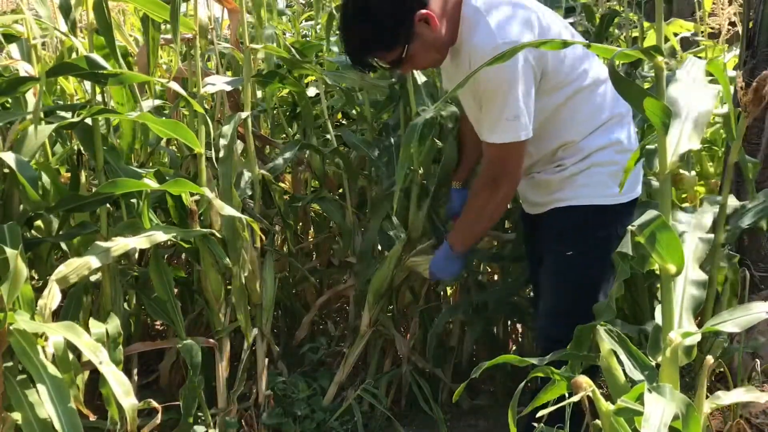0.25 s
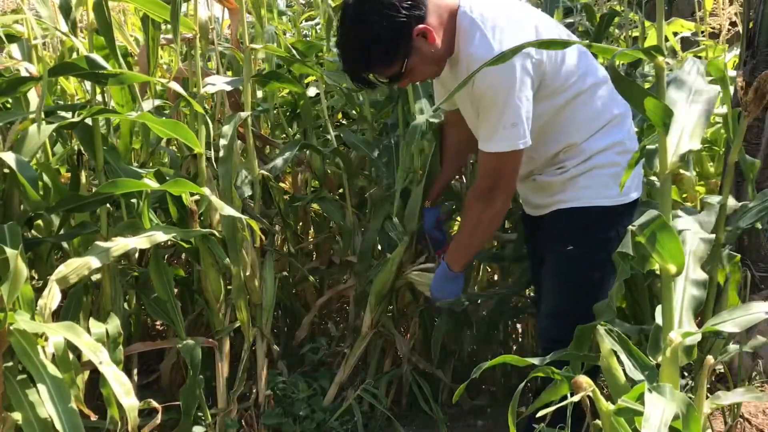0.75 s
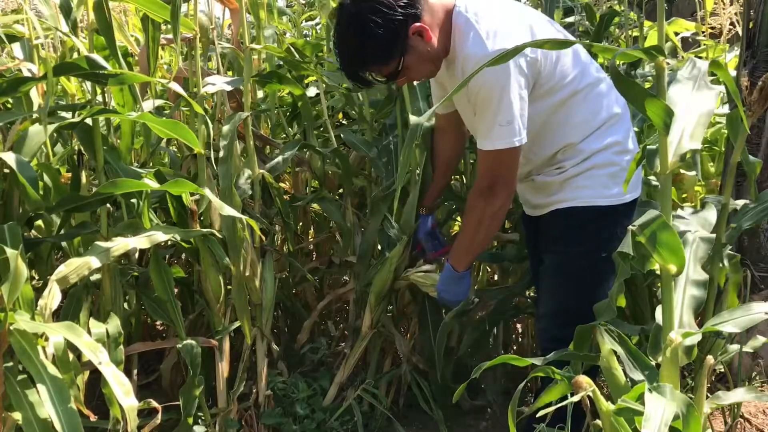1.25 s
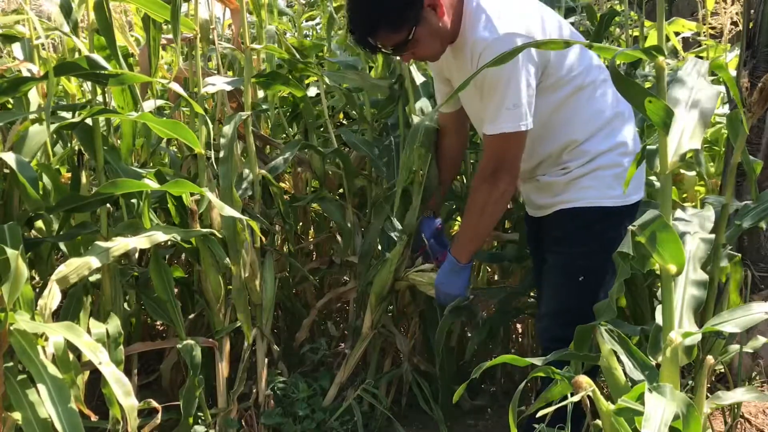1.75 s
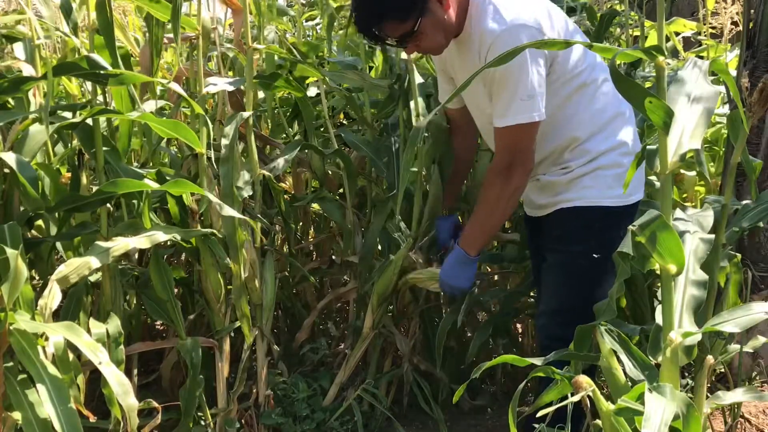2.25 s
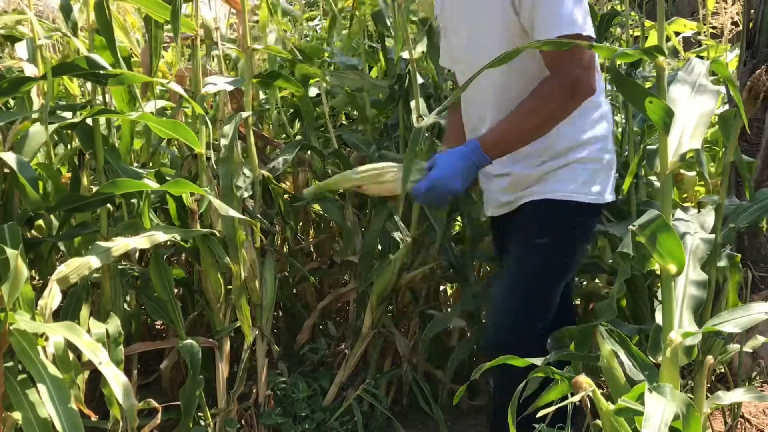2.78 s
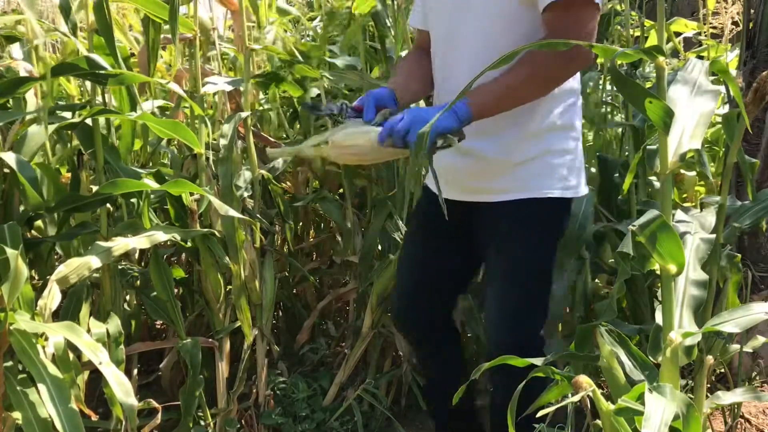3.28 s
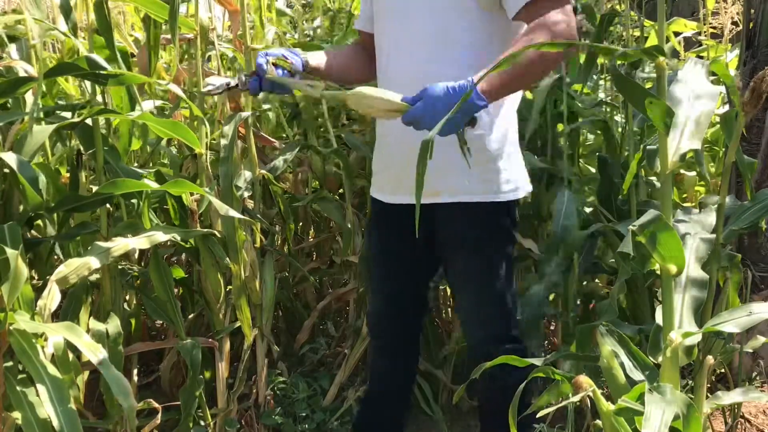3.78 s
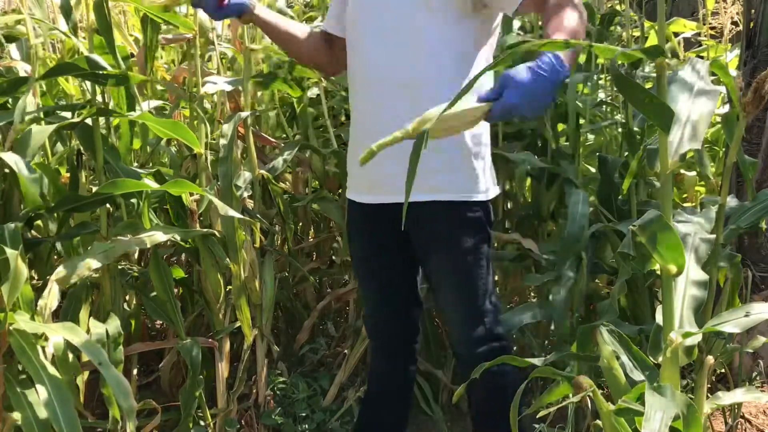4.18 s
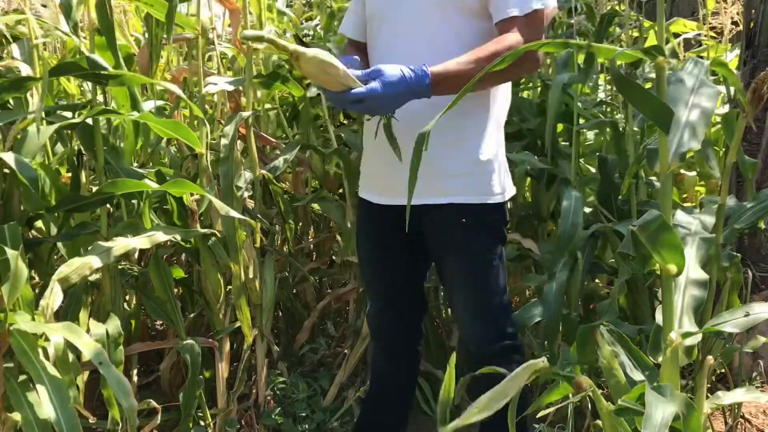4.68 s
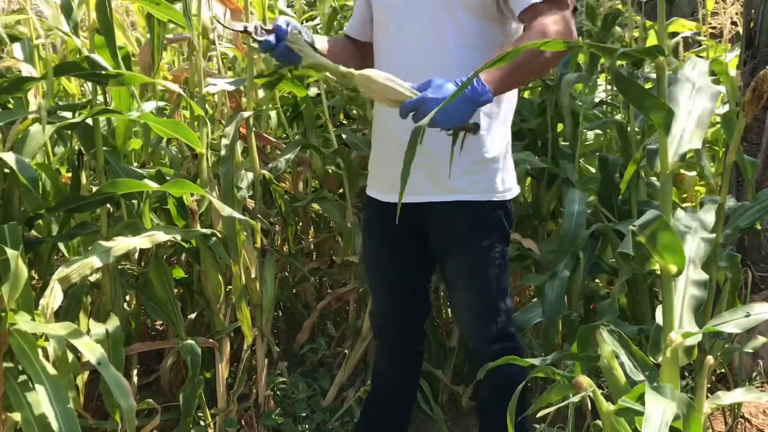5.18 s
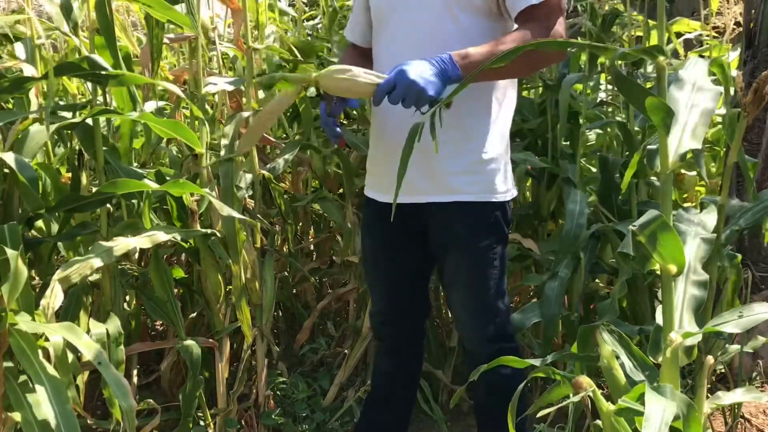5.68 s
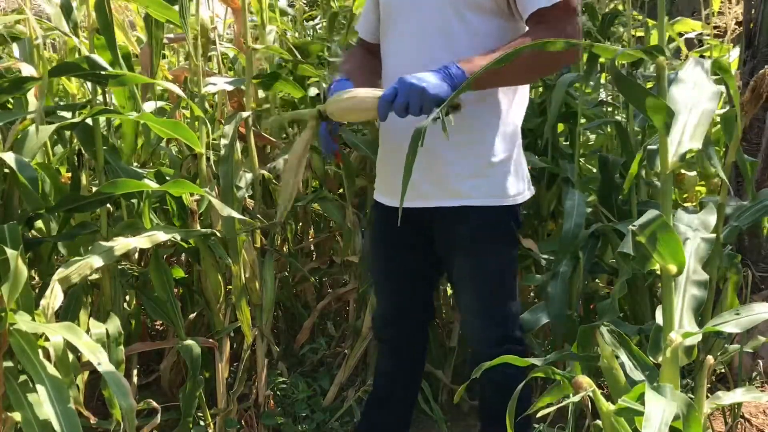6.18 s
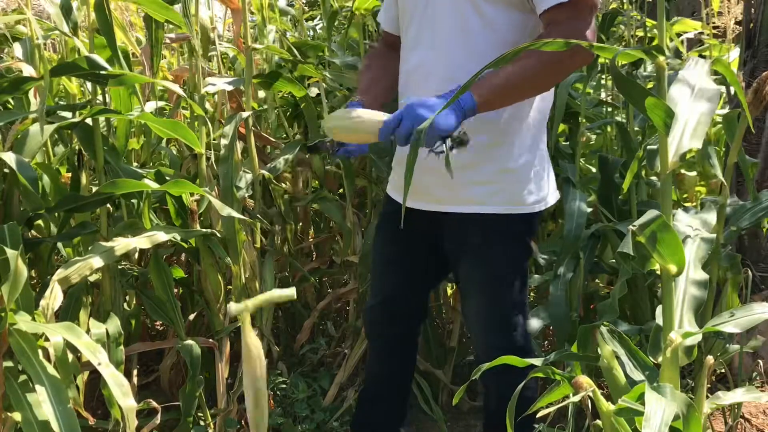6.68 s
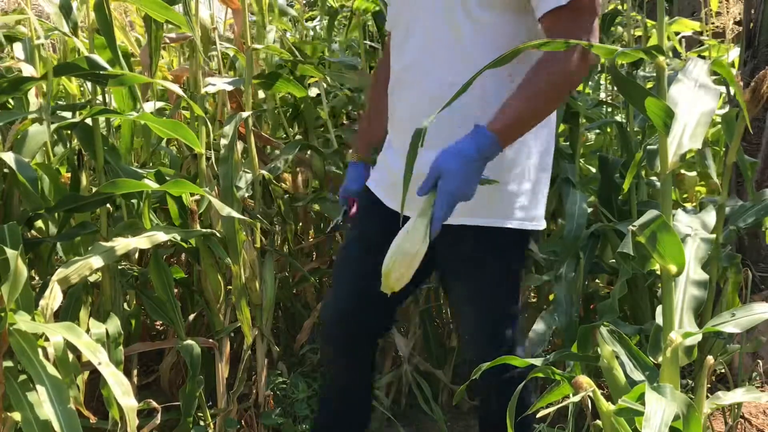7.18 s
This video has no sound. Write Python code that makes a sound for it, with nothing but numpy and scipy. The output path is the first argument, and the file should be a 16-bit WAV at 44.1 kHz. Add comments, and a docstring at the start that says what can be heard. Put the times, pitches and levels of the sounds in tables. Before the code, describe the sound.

Dry corn leaves rustle as hand shears crack through stalks and husks with sharp snips, over distant traffic hiss and a low engine hum.

```python
"""Dry leaves rustle in gloved hands in a dense garden bed, under far tyre hiss and low engine drones.
Hand shears cut plant stalks: fibres crack and crunch, the blades clack shut, husks squeak, stalks knock.
Cracks are pulses ringing a stalk; rustle and crunches are clumped ticks and noise shaped by leaf spectra.
Blades and knocks are decaying sines, squeaks broken tones in a rasp, engines unsteady low sines, traffic noise."""
import sys
import numpy as np
from scipy import signal
from scipy.fft import rfft, irfft, next_fast_len
from scipy.io import wavfile
from scipy.ndimage import uniform_filter1d, map_coordinates

SR = 44100
rng = np.random.default_rng(int(sys.argv[2]) if len(sys.argv) > 2 else 0)


def bounce(signal):
    """Save signal as a 16-bit WAV file at the path given by the first command-line argument."""
    frames = np.transpose(np.atleast_2d(signal))
    limited = np.clip(frames, -1, 1)
    pcm = np.round(limited * 32767).astype(np.int16)
    wavfile.write(sys.argv[1], SR, pcm)


def boost_factor(decibels):
    """Convert a level in decibels to a linear amplitude factor."""
    exponent = np.asarray(decibels, float) / 20
    return 10 ** exponent


N = 328104

# spectrum of dry leaves: freq_hz, relative_density_db (per Hz)
LEAF_SPECTRUM = [(800, -38), (1800, -10), (3000, 2), (5000, 1), (7000, -1), (10300, -3), (13000, 0.5),
                 (17000, -7.5)]


def unit(x):
    """Scale to rms 1."""
    return x / np.sqrt(np.mean(x ** 2) + 1e-20)


def curves(rows):
    """One value per sample for each column after the time."""
    time_s, *cols = np.transpose(rows)
    return [np.interp(np.arange(N) / SR, time_s, col) for col in cols]


def wobble(rate_hz):
    """Smooth random curve with rate_hz knots a second."""
    knots = rng.standard_normal(int(N * rate_hz / SR) + 4)
    return map_coordinates(knots, [np.arange(N) * rate_hz / SR])


def coloured(x, spectrum):
    """Filter x by (Hz, dB) points, interpolated over log frequency; rms 1."""
    size = next_fast_len(len(x) + 8192)
    freq_hz, level_db = np.transpose(spectrum)
    bins_hz = np.fft.rfftfreq(size, 1 / SR)
    gain = boost_factor(np.interp(np.log(bins_hz + 1), np.log(freq_hz + 1), level_db))
    return unit(irfft(rfft(x, size) * gain, size)[:len(x)])


def resonate(x, hz, width_hz):
    """Two-pole resonance with gain 1 at its centre."""
    return signal.lfilter(*signal.iirpeak(min(hz, .4 * SR), hz / width_hz, SR), x)


def grounded(x):
    """Add short echoes off soil and stalks; each call stretches their paths a little."""
    # echoes: nominal_delay_s, level_db
    echoes = [(.00095, -7), (.002, -6)]
    stretch = rng.uniform(.75, 1.25)
    out = x
    for delay_s, level_db in echoes:
        delayed = np.pad(x, (round(stretch * delay_s * SR), 0))[:len(x)]
        out = out + boost_factor(level_db) * delayed
    return out


def add(out, start_s, x):
    """Mix x into out from start_s."""
    part = out[round(start_s * SR):][:len(x)]
    part += x[:len(part)]


def crackle(per_second, spread_db, clump_db, share):
    """Clumped ticks of very unequal size and pitch, on a bed of noise; share is the ticks' power share."""
    pitches_hz = np.geomspace(350, 14000, num=9)
    mean_hz = pitches_hz.mean()
    ticks = np.zeros(N)
    for hz in pitches_hz:
        # small fibres break more often
        chance = per_second / SR * (hz / mean_hz) ** .5 / len(pitches_hz)
        struck = rng.random(N) < chance
        sizes = boost_factor(spread_db * rng.exponential(1, N).clip(0, 3)) * rng.standard_normal(N)
        ticks += resonate(struck * sizes, hz, .9 * hz) * (mean_hz / hz) ** .25
    share = np.clip(share, 0, 1)
    bed = np.sqrt(share) * unit(grounded(ticks)) + np.sqrt(1 - share) * rng.standard_normal(N)
    return bed * boost_factor(clump_db * wobble(35) + 0.79 * wobble(130))


def patchy(x, patchy_db):
    """Random louder and softer patches in time and pitch, as different leaves take turns."""
    z = signal.stft(x, nperseg=256)[2]
    field = uniform_filter1d(rng.standard_normal(z.shape), size=14, axis=0)
    field = uniform_filter1d(field, size=16, axis=1)
    return signal.istft(z * boost_factor(patchy_db * unit(field)), nperseg=256)[1][:len(x)]


def handled(per_second, clump_db, share):
    """One crackle heard in the leaves, in the woody stems and in papery edges; each rms 1."""
    # woody stems: freq_hz, relative_density_db (per Hz)
    stem_spectrum = [(150, -9.5), (320, -7.5), (550, -2), (900, -4), (1800, 1), (2800, -13.5), (5000, -25)]
    # thin dry leaf edges: freq_hz, relative_density_db (per Hz)
    paper_spectrum = [(4000, -46), (8000, -6), (10300, -8.5), (12500, 1.5), (17000, -10)]
    bed = patchy(crackle(per_second, spread_db=5.5, clump_db=clump_db, share=share), patchy_db=1.7)
    return coloured(bed, LEAF_SPECTRUM), coloured(bed, stem_spectrum), coloured(bed, paper_spectrum)


def rustle():
    """Dry leaves hiss and tick; thicker stems creak lower under the same movement."""
    # how hard the hands move the leaves: time_s, level_db
    movement = [(0.0, -56), (0.54, -58.5), (0.81, -57), (1.13, -62.5), (1.4, -59.5), (1.52, -67),
                (1.72, -60.5), (1.99, -63.5), (2.13, -48), (2.45, -55.5), (2.62, -54.5), (3.0, -58),
                (3.36, -54.5), (3.79, -60), (4.64, -64), (4.85, -58), (5.01, -63), (5.41, -69.5),
                (6.28, -70), (6.51, -55.5), (6.78, -63), (7.15, -55), (7.44, -62.5)]
    leaf_db, = curves(movement)
    stem_db = -68 + 0.49 * (leaf_db + 55.5)  # stems follow the movement less widely
    leaves, stems, _ = handled(1500, clump_db=-2.0, share=0.13)
    ticks = coloured(crackle(220, spread_db=2, clump_db=1, share=1), LEAF_SPECTRUM)
    return boost_factor(leaf_db) * (leaves + boost_factor(-9.5) * ticks) + boost_factor(stem_db) * stems


def traffic():
    """Tyre hiss and rumble from a distant road: slowly wavering shaped noise."""
    # road noise: freq_hz, relative_density_db (per Hz)
    road_spectrum = [(28, -48), (40, -16.5), (60, -4), (120, -9), (160, -16), (215, -17), (300, -23),
                     (520, -25), (900, -21), (1550, -29), (2500, -37), (5000, -40.5), (10300, -43.5),
                     (14000, -48), (17000, -32)]
    return boost_factor(-54 + 0.9 * wobble(2.51)) * coloured(rng.standard_normal(N), road_spectrum)


def drone(hz, level_db, rows):
    """One engine tone, a little unsteady, faded in and out around the span of its rows."""
    t = np.arange(N) / SR
    heard = np.clip(np.minimum(t - rows[0][0], rows[-1][0] - t) / 0.12 + 1, 0, 1)
    phase = 2 * np.pi * (np.cumsum(hz) / SR + rng.random()) + 0.42 * wobble(7)
    return np.sqrt(2) * heard * boost_factor(level_db + 1.6 * wobble(8)) * np.sin(phase)


def engines():
    """Near engine orders share one shaft and one resonant pipe; other engine tones hum low around them."""
    # engine pulling away and changing gear: time_s, third_order_hz, level_db (before order and pipe)
    near_engine = [(5.4, 53, -55), (5.721, 54.8, -47), (6.161, 74.8, -39.5), (6.5, 78, -37.5), (7, 84, -42),
                   (7.07, 77, -54), (7.44, 76, -56)]
    # engine orders: order, relative_level_db
    orders = [(3, 0), (4, -1), (5, -1)]
    # other engine tones: steady or slowly gliding low hums, some from the near engine after its gear change:
    # start_s, end_s, start_hz, end_hz, level_db
    other_tones = [(0, 0.9, 98.4, 109, -58), (.95, 1.76, 71.8, 69.2, -60.5),
                   (1.05, 1.85, 102.4, 107.9, -59.5), (2, 2.6, 64.1, 61.1, -59),
                   (2.3, 3.1, 68, 80.2, -56.5), (2.9, 3.67, 75.1, 84.7, -56),
                   (3.25, 3.9, 208.3, 211.6, -66), (6.6, 8.85, 49.85, 55.7, -51.5),
                   (7.05, 8.1, 100.8, 96.6, -53.5), (6.95, 8.6, 122.1, 125.4, -57.5),
                   (5.4, 6.9, 182.7, 179.5, -66)]
    exhaust_hz, exhaust_width_hz = 73, 13.3
    third_order_hz, near_db = curves(near_engine)
    out = np.zeros(N)
    for order, order_db in orders:
        hz = third_order_hz * order / 3
        pipe_db = -10 * np.log10(1 + (2 * (hz - exhaust_hz) / exhaust_width_hz) ** 2)
        out += drone(hz, near_db + order_db + pipe_db, near_engine)
    for start_s, end_s, start_hz, end_hz, level_db in other_tones:
        rows = [(start_s, start_hz, level_db), (end_s, end_hz, level_db)]
        out += drone(*curves(rows), rows)
    return out


def crack(hz, t60_s, tail_db, wide_db):
    """A sharp pulse rings the stalk, then a dying crackle as neighbouring fibres give; peak 1."""
    t = np.arange(SR // 8) / SR
    push = boost_factor(tail_db - 60 * t / t60_s) * rng.standard_normal(len(t))
    push += boost_factor(-35.0 - 60 * t / 0.16) * rng.standard_normal(len(t))  # scatter among the stalks
    push[0] = 1
    ring = resonate(push, hz, .45 * hz)
    # the stalk wall answers lower
    wall = boost_factor(-4.5) * resonate(push, 0.63 * hz, 0.14 * hz) + boost_factor(-12) * resonate(push, 860, 3700)
    treble = boost_factor(wide_db) * resonate(push, 14600, 11500)
    sound = grounded(ring + wall + treble)
    return np.pad(sound, (round(.0007 * SR), 0)) / np.abs(sound).max()


def snaps():
    """Single cracks of fibres and dry leaves; harder ones crackle on longer, high ones have more treble."""
    # cracks: start_s, peak_db, pitch_hz
    crack_events = [(0.087, -27.5, 5360), (0.171, -29, 9100), (0.178, -25, 9400), (0.195, -38, 3700),
                    (0.2309, -18, 5530), (0.2498, -22, 5000), (0.2516, -16.5, 5130), (0.271, -27, 3440),
                    (0.2782, -20.5, 5500), (0.3028, -12.5, 4900), (0.326, -10.5, 4900),
                    (0.363, -18.5, 4340), (0.6079, -19, 4470), (0.6997, -27, 2650), (0.789, -26.5, 3500),
                    (0.792, -25, 13000), (0.8263, -22.5, 4950), (0.8335, -24, 8540), (1.039, -25, 5100),
                    (1.109, -38, 9000), (1.643, -40, 13000), (1.947, -16.5, 3680), (1.967, -24, 6600),
                    (2.0115, -27, 5970), (2.0205, -36, 2600), (2.0342, -23, 6500), (2.0475, -19, 8500),
                    (2.0508, -13.5, 8150), (2.0585, -13.5, 4030), (2.0776, -17, 3920), (2.211, -29, 4000),
                    (2.375, -33.5, 2330), (2.4997, -26, 7000), (2.781, -32.5, 4340), (3.0802, -32.5, 1640),
                    (3.226, -33, 2400), (3.284, -31, 8870), (3.354, -28.5, 4250), (3.451, -28, 5500),
                    (3.694, -31, 5980), (3.793, -28.5, 4230), (3.922, -31.5, 5500), (3.928, -27, 4790),
                    (4.0395, -21, 1950), (4.0439, -12, 6760), (4.062, -19.5, 4300), (4.1085, -35, 5000),
                    (4.1206, -29, 4280), (4.1511, -31, 12500), (4.1625, -36, 11000), (4.271, -38, 4110),
                    (4.6414, -24, 2730), (4.932, -31.5, 2330), (4.956, -21, 6500), (4.964, -22, 6000),
                    (4.9706, -19.5, 2950), (4.979, -21.5, 1900), (4.9962, -22.5, 5500), (5.229, -33, 7900),
                    (5.306, -28, 4730), (5.749, -37.5, 5950), (6.283, -38, 4060), (6.321, -27.5, 6400),
                    (6.344, -32, 6630), (6.362, -27.5, 3300), (6.3655, -26, 11000), (6.385, -33, 2600),
                    (6.404, -33, 6200), (6.413, -35, 3200), (6.433, -32, 6200), (6.466, -36, 6500),
                    (6.479, -30, 11000), (6.4853, -24.5, 3000), (6.5092, -18, 7000), (6.57, -29.5, 11100),
                    (6.578, -30.5, 7000), (6.646, -36, 2940), (6.6755, -31.5, 2310), (6.775, -31.5, 3000),
                    (6.8125, -26, 8500), (6.816, -17, 11400), (6.856, -37, 10500), (6.863, -36, 12500),
                    (6.8995, -24.5, 3980), (7.0932, -28.5, 9800), (7.2, -29, 8300), (7.226, -29.5, 7000),
                    (7.372, -37, 7000)]
    out = np.zeros(N)
    for start_s, peak_db, hz in crack_events:
        t60_s = 0.027 * boost_factor(0.55 * (peak_db + 10.5))
        wide_db = -8.5 + 7 * np.log2(hz / 5000)  # woody cracks are duller
        add(out, start_s, boost_factor(peak_db) * crack(hz, t60_s, tail_db=-18.5, wide_db=wide_db))
    return out


def crunches():
    """Dense cracking: squeezes build pressure until the fibres part, tears start suddenly and die away."""
    # squeezes: start_s, length_s, level_db, papery_share (0-1)
    squeezes = [(.665, 0.086, -49.5, 0.05), (.84, 0.021, -43.5, 0.2), (1.992, 0.063, -38.5, 0.49),
                (2.062, 0.027, -31, 0.25), (2.16, 0.1, -47.5, 0.07), (3.118, 0.058, -43, 0.2),
                (3.165, 0.07, -48, 0.25), (3.22, 0.052, -45, 0.47), (3.366, 0.12, -45, 0.15),
                (3.456, 0.08, -47.5, 0.55), (4.037, 0.022, -36, 0.4), (4.057, 0.011, -33, 0.03),
                (4.32, 0.041, -51, 0.1), (4.868, 0.022, -42, 0.35), (4.966, 0.031, -33.5, 0.54),
                (5.252, 0.041, -48.5, 0.4), (5.296, 0.019, -50, 0.3), (6.483, 0.041, -33, 0.23)]
    # tears and shakes: start_s, length_s, level_db, papery_share (0-1)
    tears = [(.63, 0.074, -51, 0.3), (.967, 0.16, -51.5, 0.3), (2.078, 0.043, -37, 0.5),
             (2.48, 0.24, -46.5, 0.64), (4.065, 0.025, -47, 0.2), (4.1, 0.056, -45, 0.12),
             (4.15, 0.039, -44.5, 0.33), (4.266, 0.036, -48.5, 0.03), (4.68, 0.23, -51.5, 0.16),
             (4.885, 0.12, -53, 0.2), (4.954, 0.016, -39.5, 0.1), (4.992, 0.044, -42.5, 0.2),
             (6.33, 0.29, -56.5, 0.7), (6.507, 0.058, -40.5, 0.4), (6.785, 0.18, -48.5, 0.53),
             (7.08, 0.1, -51, 0.96)]
    # thick husk leaves: freq_hz, relative_density_db (per Hz)
    husk_spectrum = [(1200, -15), (2500, -0.5), (4200, 0), (6500, -2), (9000, -2), (14000, -27)]
    t, out = np.arange(N) / SR, np.zeros(N)
    _, stems, paper = handled(3000, clump_db=-0.5, share=0.24)
    husk = patchy(crackle(1600, spread_db=3, clump_db=2, share=0.45), patchy_db=1.5)
    husk = coloured(husk, husk_spectrum)
    # second value: share of the length before the loudest moment
    for rows, peak in (squeezes, 0.6), (tears, 0.12):
        for start_s, length_s, level_db, thin in rows:
            thin = np.clip(thin, 0, 1)
            times_s = [start_s, start_s + peak * length_s, start_s + length_s]
            swell = boost_factor(level_db) * np.interp(t, times_s, [0, 1, 0]) ** 1.04
            woody = boost_factor(-5.5 - np.log2(length_s / .03))  # longer crunches are leafier
            out += swell * (np.sqrt(thin) * paper + np.sqrt(1 - thin) * husk + woody * stems)
    return out


def snips():
    """Steel blades meet at the end of a cut: a crack and a short, rattling ring."""
    # blade contacts: start_s, level_db (nominal)
    closings = [(2.081, -12), (6.514, -14)]
    # blade modes: freq_hz, level_db, t60_s
    blade_modes = [(2330, -19.5, 0.029), (5980, -5, 0.013), (6280, 1, 0.0095), (6200, -23, 0.14),
                   (7500, -17, 0.0065)]
    out, t = np.zeros(N), np.arange(SR // 5) / SR
    for start_s, level_db in closings:
        ring = np.zeros(len(t))
        for hz, mode_db, t60_s in blade_modes:
            decay = boost_factor(mode_db + rng.normal(0, 2.4) - 60 * t / t60_s)
            ring += decay * np.sin(2 * np.pi * hz * t)
        # the blades rattle on their pivot
        chatter = unit(uniform_filter1d(rng.standard_normal(len(t)), size=45))
        steady = np.exp(-t / .006)
        ring = ring * (steady + (1 - steady) * chatter)
        add(out, start_s + 0.0008, boost_factor(level_db + 3) * ring * (1 - np.exp(-t / 0.00054)))
        add(out, start_s, boost_factor(level_db - 3.0) * crack(6900, 0.041, tail_db=-9, wide_db=-4))
    return out


def squeaks():
    """Glove on husk, stick and slip: a wavering tone that keeps breaking off, in a rasp of noise."""
    # rubs: start_s, end_s, pitch_hz, level_db
    rubs = [(3.134, 3.2, 1750, -51.5), (3.204, 3.267, 1950, -52), (4.731, 4.846, 1797, -48)]
    out = np.zeros(N)
    pitch_factor, grip_db = 1 + 0.035 * wobble(400), 6 * wobble(110)
    for start_s, end_s, hz, level_db in rubs:
        first, n = round(start_s * SR), round((end_s - start_s) * SR)
        span = slice(first, first + n)
        tone = np.sin(2 * np.pi * np.cumsum(hz * pitch_factor[span]) / SR)
        rasp = unit(resonate(rng.standard_normal(n), hz, 350))
        rub = unit(boost_factor(grip_db[span]) * tone + rasp)
        add(out, start_s, boost_factor(level_db) * np.hanning(n) ** .5 * rub)
    return out


def thumps():
    """A hollow cob or stalk is knocked: one soft note that dies within a few cycles."""
    # knocks: start_s, pitch_hz, level_db (before onset and decay)
    knocks = [(3.485, 343, -38.5), (3.52, 430, -39), (4.11, 348, -40), (4.98, 298, -43),
              (6.487, 725, -29.5), (6.501, 633, -31.5), (6.513, 338, -35), (6.685, 650, -41),
              (6.9002, 2670, -21.5)]
    out, t = np.zeros(N), np.arange(SR // 8) / SR
    for start_s, hz, level_db in knocks:
        decay = boost_factor(level_db - 60 * t * hz / 17)  # 60 dB in 17 cycles
        onset = 1 - np.exp(-t * hz / 1.37)
        add(out, start_s, decay * onset * np.sin(2 * np.pi * hz * t))
    return out


def scene():
    """Sum of all sources in one channel."""
    background = rustle() + traffic() + engines()
    cutting = snaps() + crunches() + snips()
    return (background + cutting + squeaks() + thumps())[None]


def roll_off(x):
    """The treble ends steeply here."""
    return signal.sosfilt(signal.butter(12, 16830, fs=SR, output="sos"), x)


def record(dry):
    """Turn the band above 15750 Hz down by 45 dB and finish the mix."""
    spectrum = rfft(dry)
    spectrum[:, np.fft.rfftfreq(N, 1 / SR) > 15750] *= boost_factor(-45)
    mix = irfft(spectrum, N)
    return roll_off(mix)


dry = scene()
out = record(dry)
bounce(out)
```